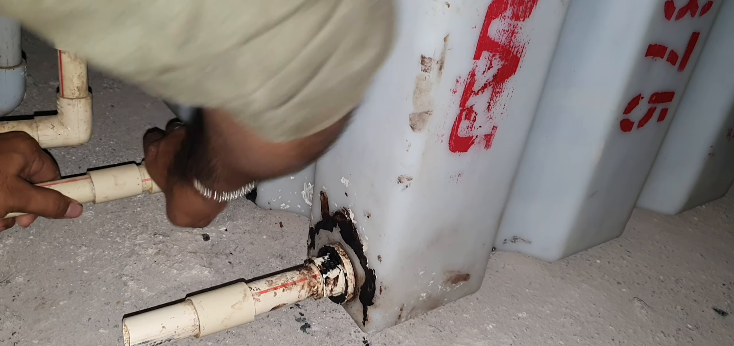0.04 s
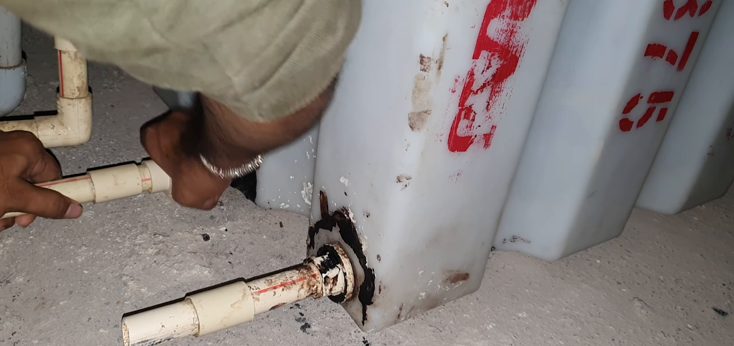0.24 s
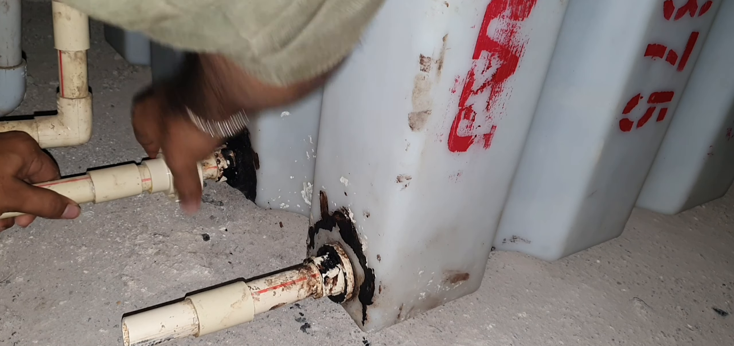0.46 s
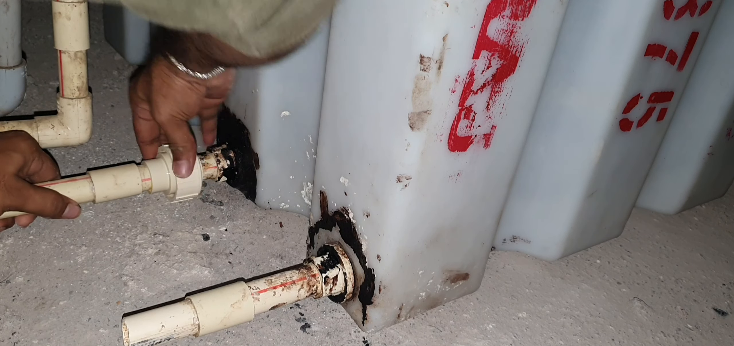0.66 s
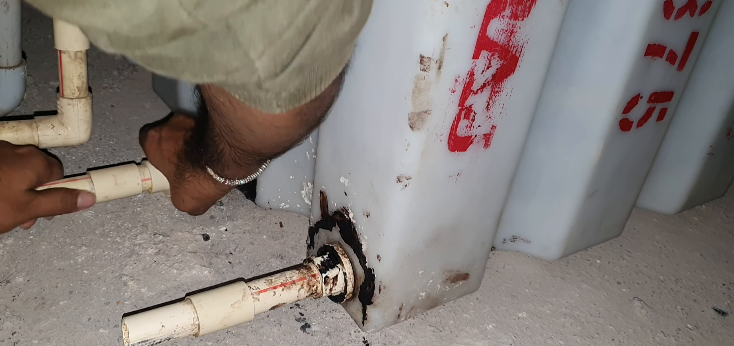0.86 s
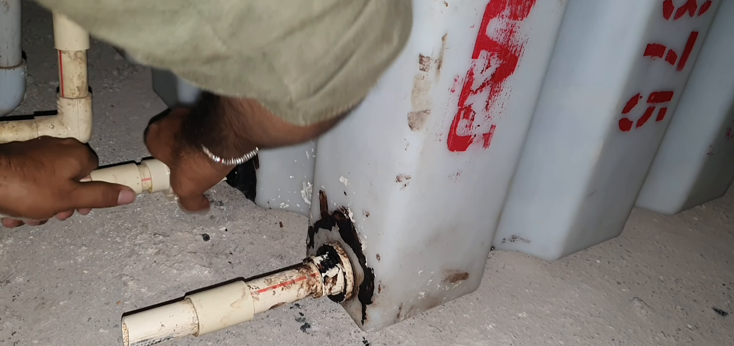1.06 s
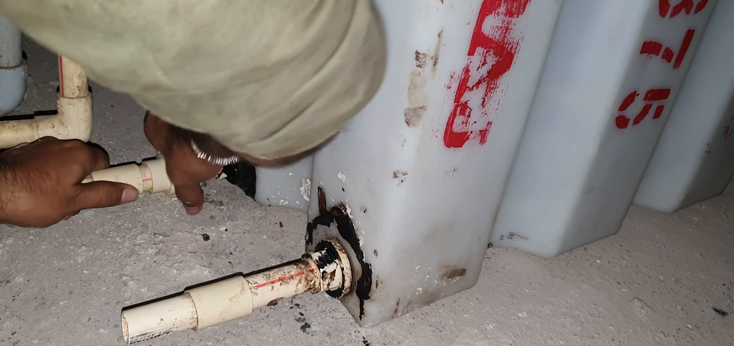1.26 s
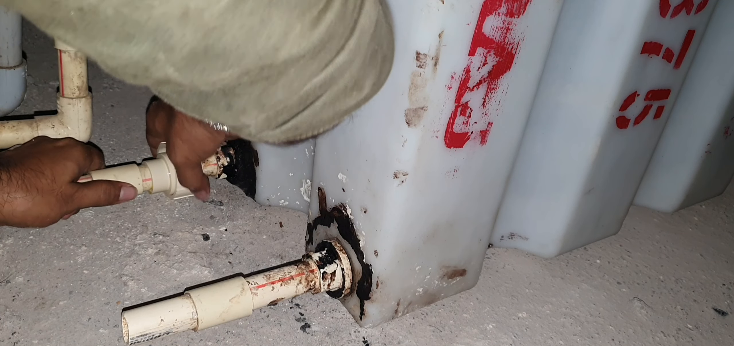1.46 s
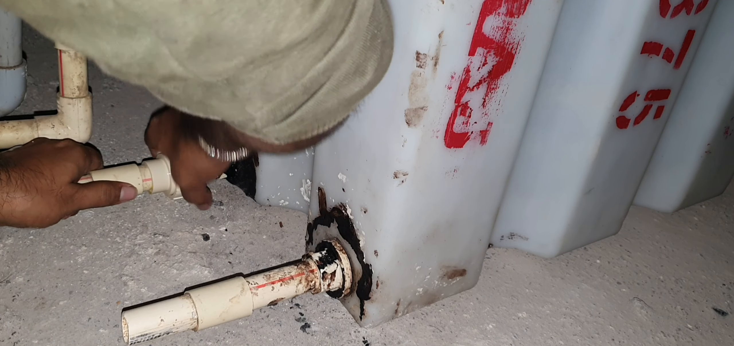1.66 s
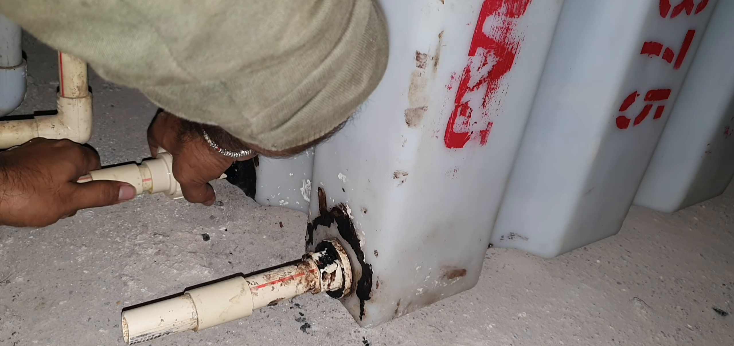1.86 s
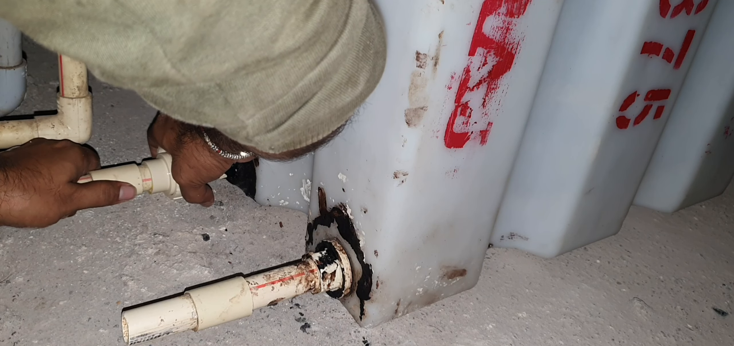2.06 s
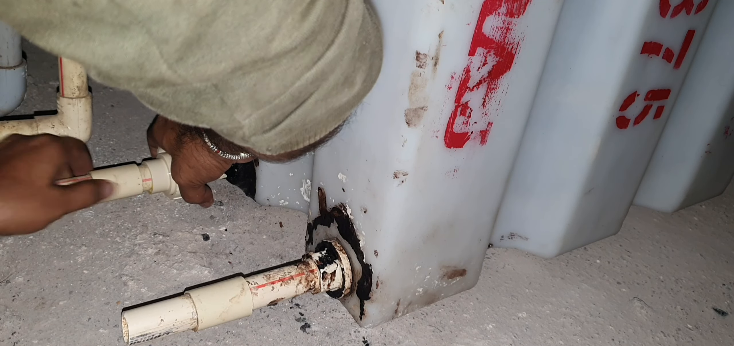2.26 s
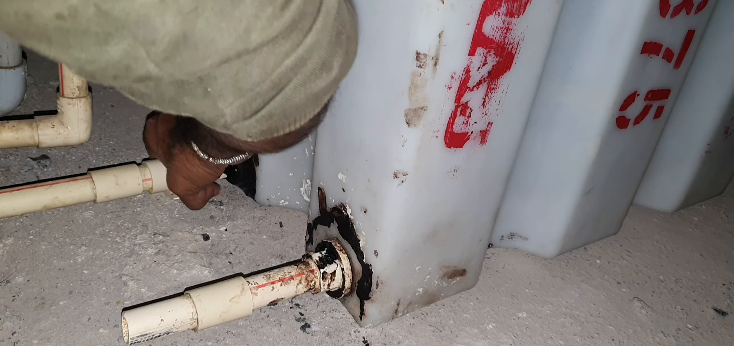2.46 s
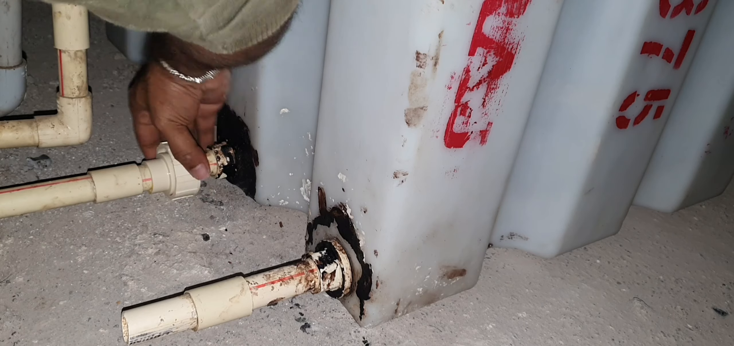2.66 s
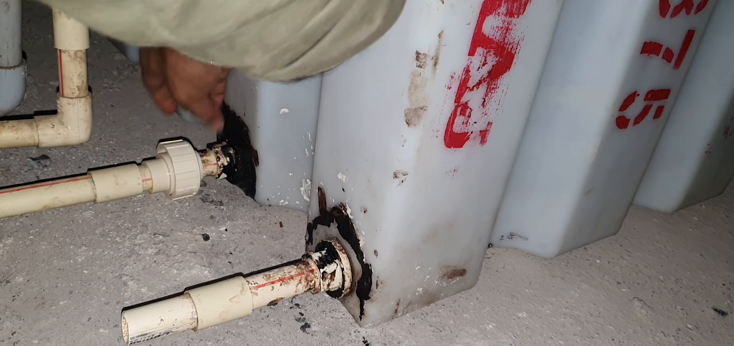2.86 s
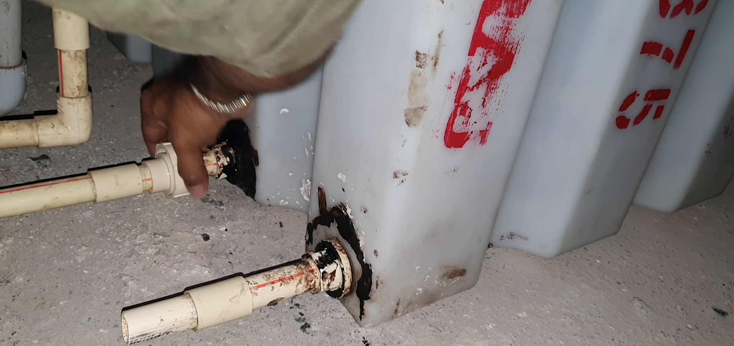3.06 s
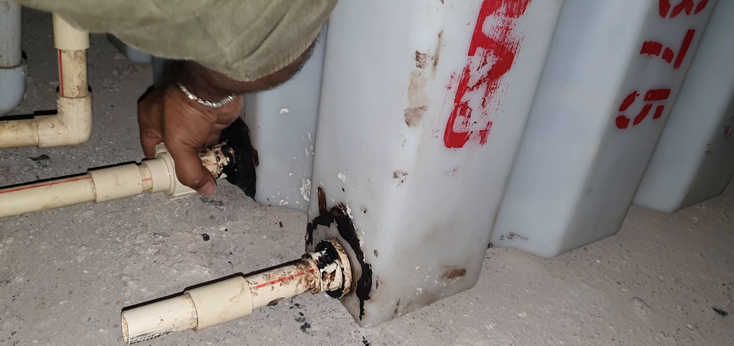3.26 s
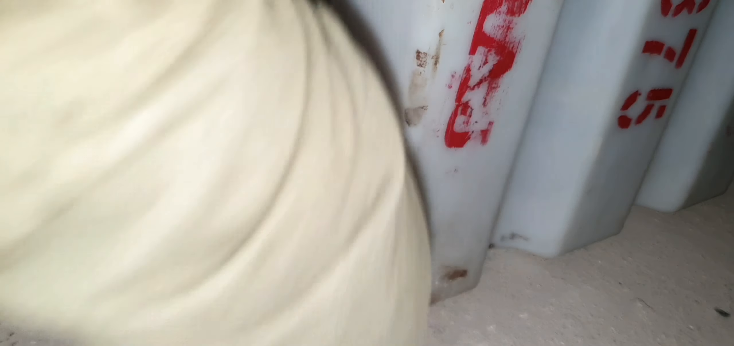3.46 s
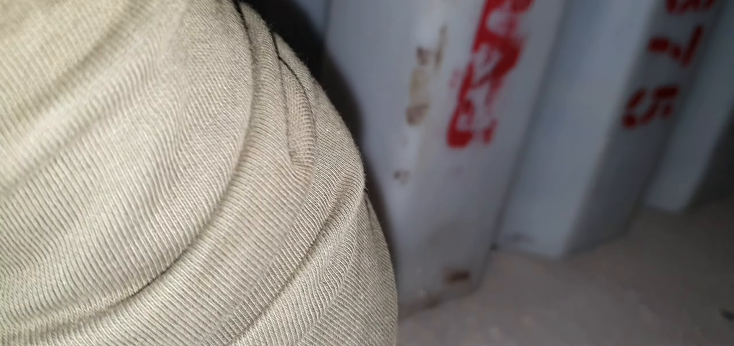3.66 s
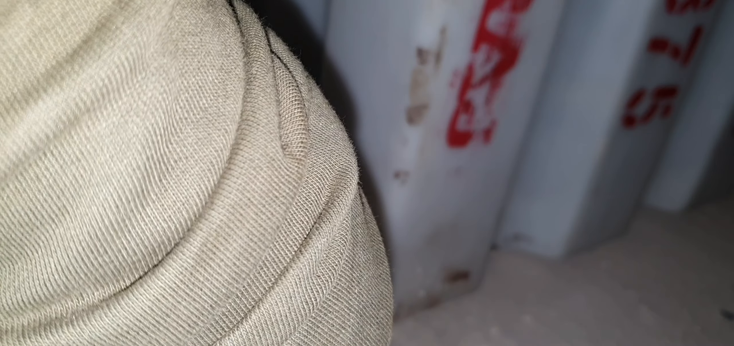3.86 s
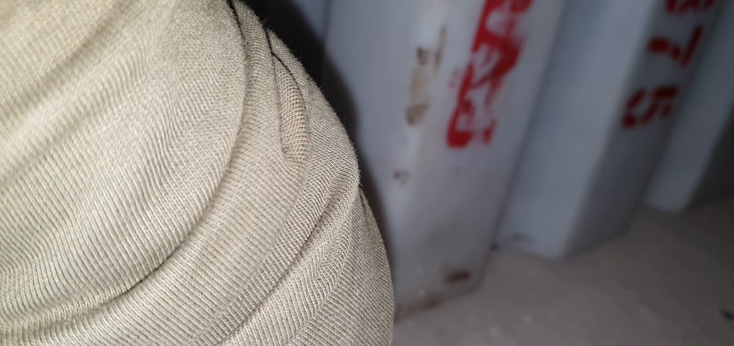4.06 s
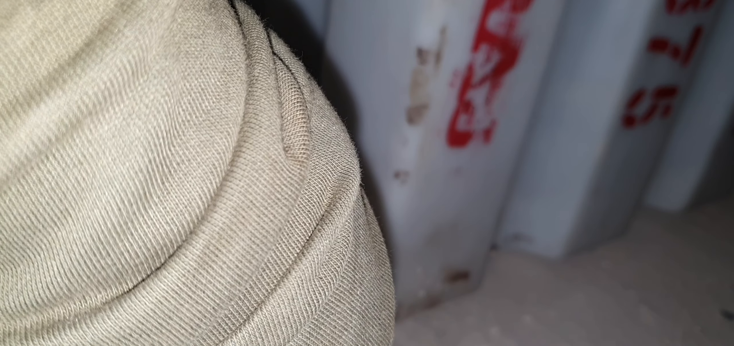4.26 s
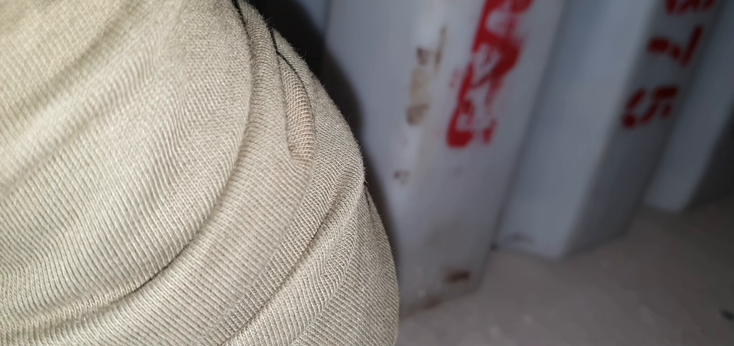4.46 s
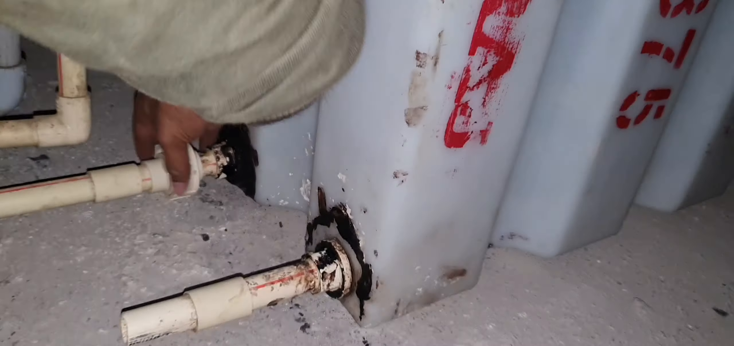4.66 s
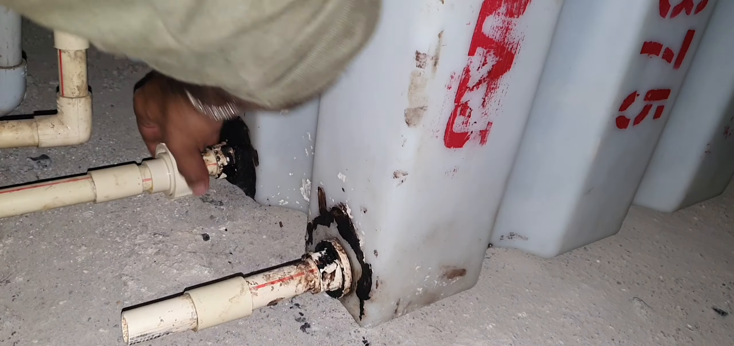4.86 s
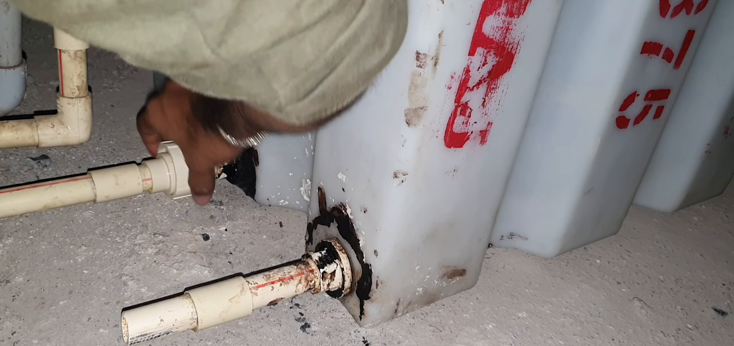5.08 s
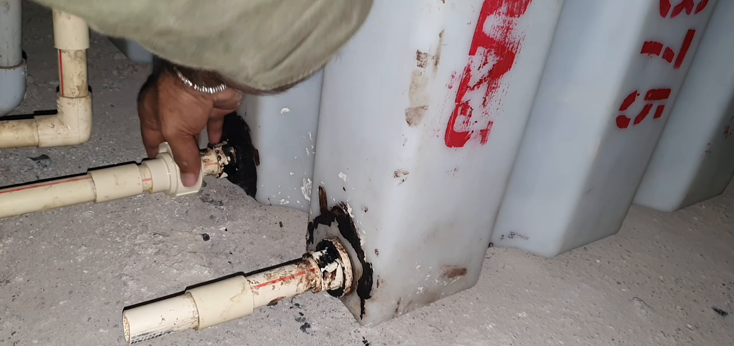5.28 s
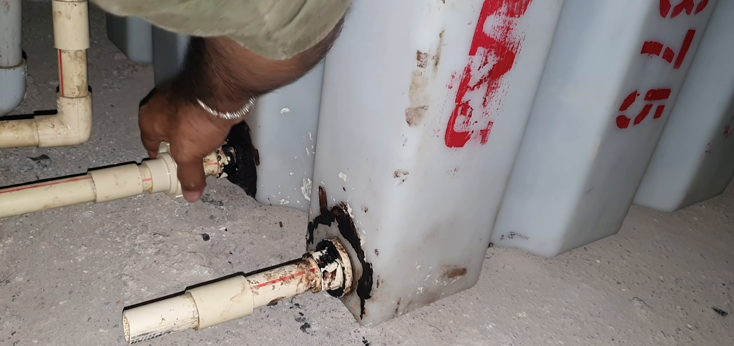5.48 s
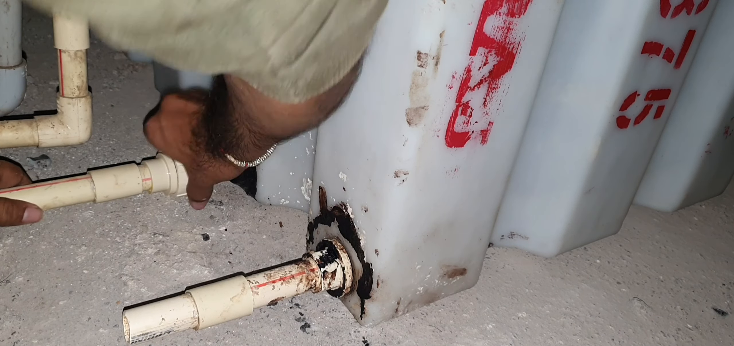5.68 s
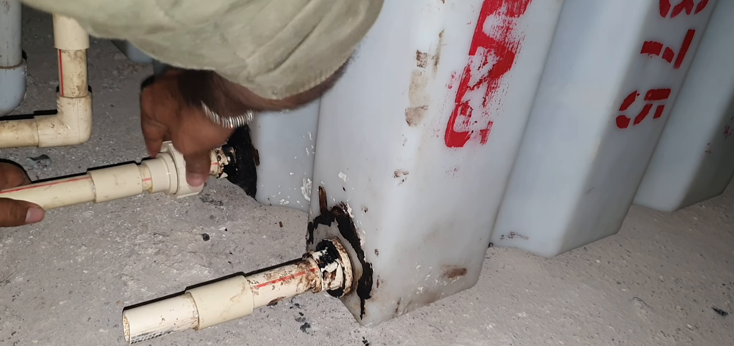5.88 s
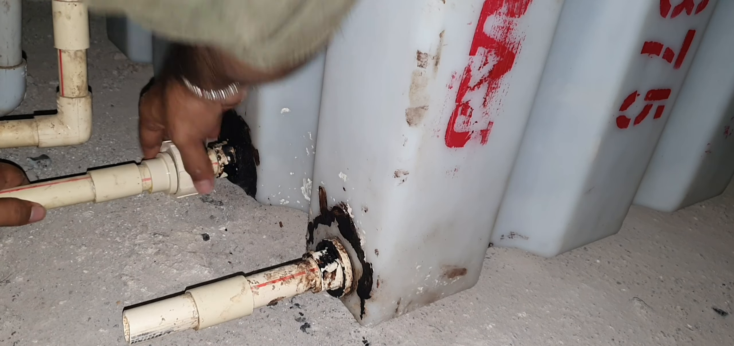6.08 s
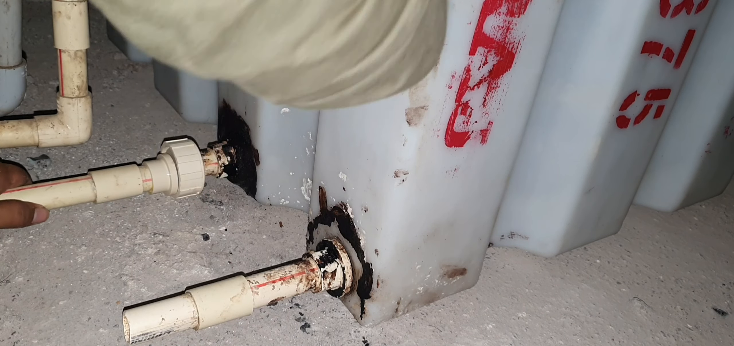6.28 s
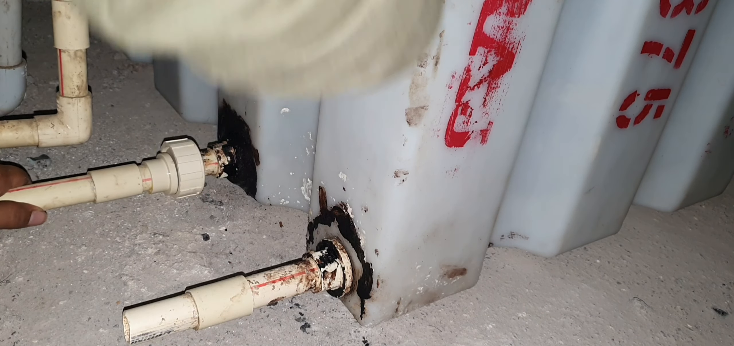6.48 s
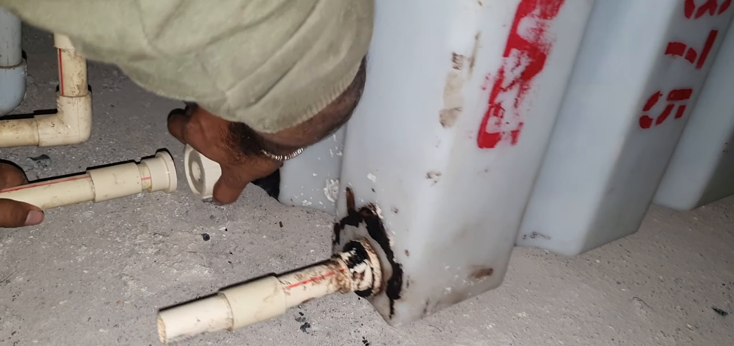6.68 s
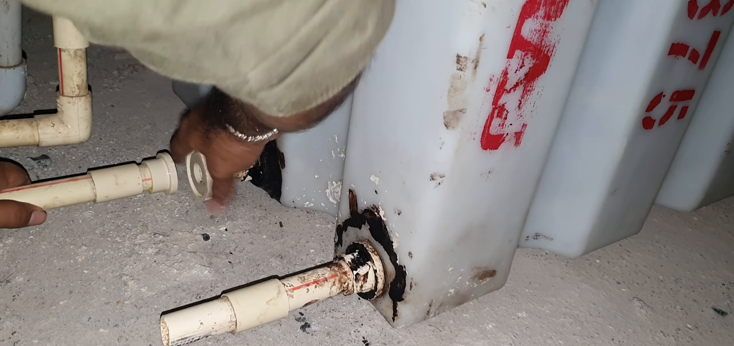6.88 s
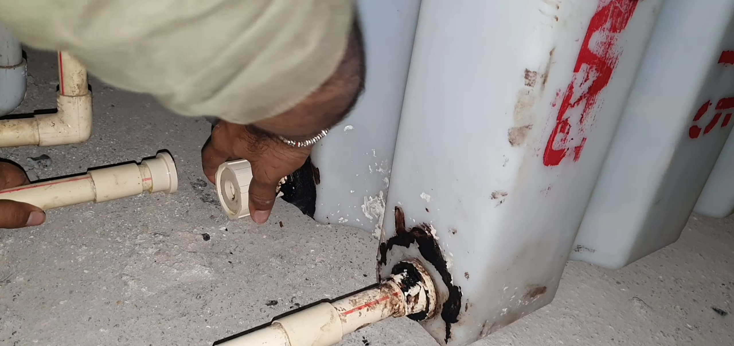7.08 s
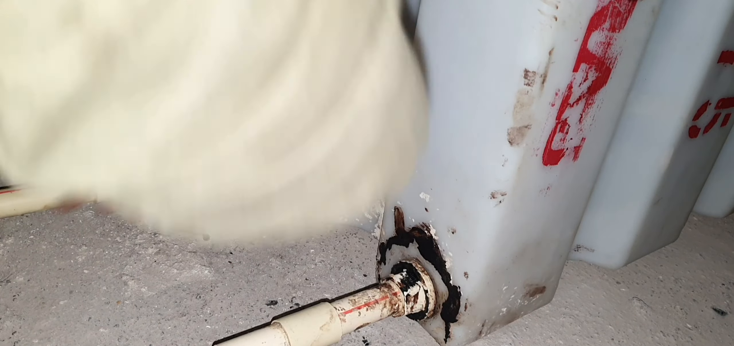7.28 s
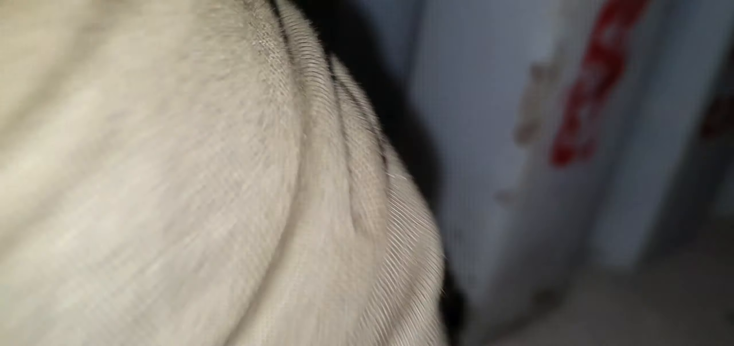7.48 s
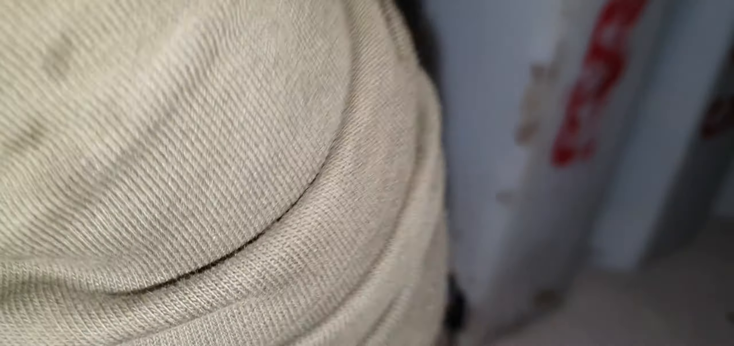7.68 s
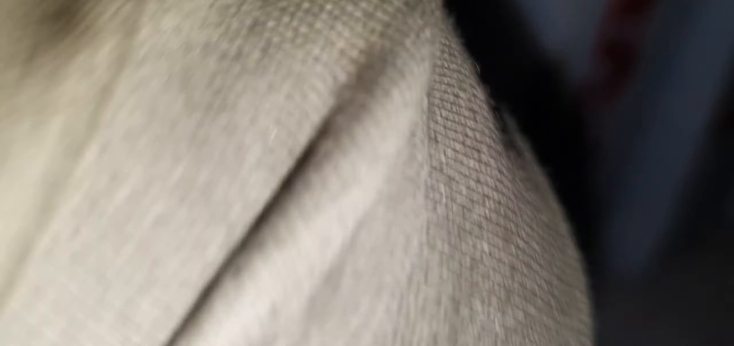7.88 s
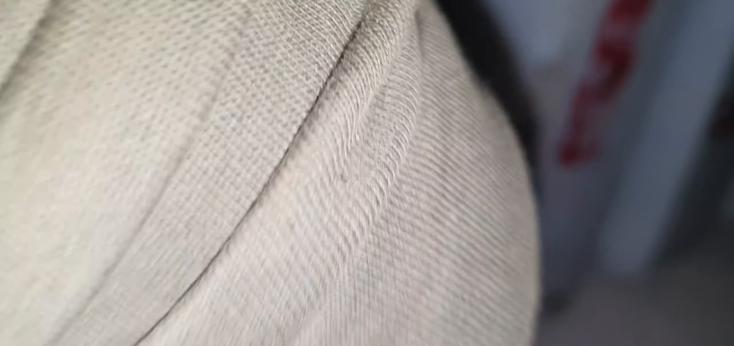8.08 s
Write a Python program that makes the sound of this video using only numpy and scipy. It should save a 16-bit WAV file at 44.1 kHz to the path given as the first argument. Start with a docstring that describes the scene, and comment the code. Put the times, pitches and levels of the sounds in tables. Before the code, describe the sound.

Close plastic fitting work in a quiet bare room: hollow bumps, sharp thread snaps and gritty rubbing, in busy bursts separated by short rests.

```python
"""A hand unscrews a plastic nut on a pipe beside a large hollow tank, in a quiet bare room: about 8 seconds.
First come clicks, scrapes and thuds; after a short rest a second bout, then a longer rest.
The third bout is the longest and busiest, running on into more turning; a few last touches end the scene.
Noise rings the nut and microphone, sine waves ring the tank, filtered noise rumbles in the pipe; a murmur lies below.
The microphone has an open port and a covered one, which hears the treble more faintly."""
import sys
import numpy as np
from scipy import signal
from scipy.fft import rfft, irfft, next_fast_len
from scipy.io import wavfile
from scipy.ndimage import uniform_filter1d

SR = 44100
rng = np.random.default_rng(int(sys.argv[2]) if len(sys.argv) > 2 else 0)


def put_to_file(sound):
    """Save the sound as 16-bit audio at rate SR, in the file named by the first command-line argument."""
    columns = np.atleast_2d(sound).T  # one column per channel
    safe = np.clip(columns, -1, 1)
    whole_steps = np.round(safe * 32767)
    wavfile.write(sys.argv[1], SR, whole_steps.astype(np.int16))


N = 358533

# Murmur of the room, its spectrum: pitch_hz, level_db (per Hz)
ROOM_SPECTRUM = [(12, -32.5), (20, -8.5), (81, 2), (116, 2), (172, -14.5), (241, -11), (301, -6.5),
                 (1060, -29.5), (1150, -26), (2080, -35.5), (3950, -38.5), (6180, -43.5), (7310, -59.5),
                 (11800, -53), (16000, -59.5)]
ROOM_DB = -52
# Slow swell of the murmur: time_s, swell (no unit; 1 lifts the bass by 3 dB)
MURMUR_SWELL = [(0, 1), (1.602, 0), (2.102, 0.5), (2.6, 0), (3.7, -0.5), (4.5, -0.5), (7.4, -1), (7.8, 0)]
SWELL_TILT = 0.65  # extra dB per octave above 400 Hz for a swell of 1

# How the two ports differ: pitch_hz, level_db (by which the open port is louder)
COVER_LOSS = [(60, -3.5), (120, -1), (240, 1.5), (480, 4), (950, 9.5), (1890, 9.5), (3770, 12.5),
              (7520, 11), (15000, 6.5)]
# How alike the two ports sound: pitch_hz, likeness (0 to 1)
PORT_LIKENESS = [(60, 0.98), (200, 0.88), (350, 0.8), (700, 1), (3000, 0.3), (7000, 0.54), (12000, .7)]
HOUSING_HZ, EDGE_HZ = 2500, 16300  # upper limits of the housing and of the whole sound

# Spectrum of the shaking pipe: pitch_hz, level_db (per Hz)
SHAKE_SPECTRUM = [(12, -33.5), (24, -16), (38, -7), (48, 10), (62, 1), (80, -3), (100, -12.5), (140, -81.5),
                  (300, -110)]
# Spectrum of the creaking pipe: pitch_hz, level_db (per Hz)
CREAK_SPECTRUM = [(50, -39.5), (80, -4.5), (120, 8.5), (200, -0.5), (300, -9.5), (480, -19), (800, -35.5),
                  (1500, -70), (3000, -110)]
# Spectrum of the rattling loose pipe: pitch_hz, level_db (per Hz)
RATTLE_SPECTRUM = [(120, -37), (240, 3), (320, 1.5), (470, -0.5), (600, -11.5), (900, -26), (1500, -63),
                   (3000, -110)]
# The grip, one list for each bout of work: time_s, shaking_db, rubbing_db
GRIP_BOUTS = [
    [(0.0, -24.5, -41.5), (0.07, -26, -78), (0.138, -43, -73), (0.176, -26.5, -61), (0.746, -48.5, -68.5),
     (0.848, -30.5, -59.5), (0.918, -41, -70), (1.106, -22.5, -80), (1.154, -46, -65.5),
     (1.584, -47.5, -83.5), (1.72, -76, -89)],
    [(2.27, -67, -77.5), (2.512, -48, -60.5), (2.564, -23, -67.5), (2.62, -37, -69), (2.66, -27.5, -68),
     (3.008, -38.5, -68), (3.072, -30.5, -65), (3.36, -39.5, -62), (3.396, -39, -59.5), (3.65, -46, -83),
     (3.72, -60.5, -85.5)],
    [(4.62, -50, -69), (4.726, -53.5, -72), (4.834, -25, -56), (4.904, -38, -58), (4.932, -26, -57.5),
     (5.566, -34, -61.5), (5.614, -26.5, -58), (5.692, -34.5, -61.5), (6.164, -27, -65), (6.28, -24.5, -70),
     (6.38, -44.5, -90)],
    [(6.38, -55, -84.5), (6.414, -42, -93), (6.578, -48, -63), (6.742, -10.5, -67.5), (6.814, -25.5, -68),
     (6.982, -41, -79), (7.012, -26, -63), (7.112, -36, -67), (7.152, -47, -67), (7.274, -54, -62.5),
     (7.32, -75, -73)],
    [(7.58, -72, -67.5), (7.65, -69.5, -69), (7.672, -66, -68), (7.74, -52.5, -59), (7.766, -75, -66),
     (7.784, -57, -81), (7.84, -68, -61), (7.932, -26.5, -60.5), (8.01, -45.5, -89.5), (8.098, -89, -52),
     (8.13, -72, -74)],
]
CREAK_DB, CREAK_SHARE = -12.5, 0.98  # creak level, and its dB for each dB of shaking

# Ways the tank rings: pitch_hz, level_db
TANK_MODES = [(52, -8.5), (80, -0.5), (105, -1.5), (130, -0.5), (160, 0), (193, 0), (235, 0), (310, -8),
              (390, -5.5), (480, -6.5)]
# Swelling thuds: peak_s, level_db, favoured_pitch_hz, hardness_db, length_s
SWELLING_THUDS = [(0.068, -33, 172, -26, .03), (0.178, -6.5, 142.2, -24, 0.018),
                  (0.202, -7, 163, -13, 0.02), (0.264, -16.5, 102, -33.5, 0.01),
                  (0.325, -11.5, 86, -13, 0.033), (0.347, -18, 178, -30, 0.03), (0.495, -18, 191, -5, .017),
                  (0.586, -21.5, 127.5, -17, 0.039), (0.639, -22.5, 81, -13, 0.022),
                  (0.699, -27, 110, -34, .07), (0.823, -13, 114.5, -14.5, 0.033),
                  (0.983, -28.5, 185, -28, 0.023), (1.032, -4.5, 107, -17, 0.03),
                  (1.223, -16.5, 109.4, -8.5, 0.032), (1.399, -13, 181.4, -5, 0.017),
                  (1.435, -11.5, 137.3, -7.5, 0.023), (1.581, -40.5, 67.4, -28.5, .07),
                  (2.351, -31, 175.4, -11, 0.036), (2.36, -37, 79, -26, 0.082),
                  (2.647, -21.5, 74, -24, 0.043), (2.7, -27, 116.7, -16.5, 0.098),
                  (2.762, -34, 128, -31, .042), (2.835, -21, 141, -6, 0.035),
                  (3.072, -25, 88.4, -14.5, 0.11), (3.2, -24.5, 78.5, -24, 0.064),
                  (3.375, -35, 180, -20.5, 0.028), (3.441, -42.5, 130, -5, 0.041),
                  (3.574, -33.5, 113, -35, 0.017), (4.77, -33.5, 79.7, -16, 0.04),
                  (4.829, -27.5, 502.5, 1.5, 0.021), (4.937, -15.5, 110.5, -30, .025),
                  (5.04, -27.5, 129.6, -7, 0.074), (5.124, -30.5, 89.8, -13, 0.027),
                  (5.165, -26.5, 78.7, -8.5, .06), (5.27, -9, 116, -8, .035),
                  (5.589, -12.5, 101.6, -7, .021), (5.612, -6, 110, -14, .037),
                  (5.724, -13.5, 87.1, -8, 0.032), (5.799, -28, 74, -29.5, .044),
                  (5.826, -18, 120.4, 1, .016), (5.937, -27, 109, -42.5, .021), (6, -16, 150, -14.5, 0.022),
                  (6.084, -14.5, 160.2, -11.5, 0.032), (6.153, -22.5, 74.6, -26, 0.14),
                  (6.224, -7, 119, -12, 0.038), (6.245, -21.5, 186.4, -8.5, 0.038),
                  (6.425, -27.5, 75, -31, 0.03), (6.467, -23, 126, -15.5, .026),
                  (6.511, -27.5, 167, -11.5, .03), (6.556, -21.5, 114.6, -22.5, .018),
                  (6.68, -14.5, 120.2, -2.5, 0.059), (6.732, -12.5, 150.8, -12, 0.06),
                  (6.773, -28.5, 449, -4, 0.027), (6.871, -18.5, 125.8, -7.5, 0.039),
                  (7.049, -21, 153.5, -30, 0.026), (7.144, -30.5, 91.1, -11, 0.07),
                  (7.265, -34.5, 113.7, -9.5, 0.042), (7.681, -43, 252, -12.5, 0.015),
                  (7.687, -23.5, 491, -15, 0.021), (8.083, -29, 406, -12, 0.014),
                  (8.09, -33, 137.5, -17, 0.014)]
# Sudden blows as the nut seats or the pipe hits: peak_s, level_db, favoured_pitch_hz, hardness_db, length_s
SUDDEN_BLOWS = [(0.046, -11, 112.3, -10.5, 0.031), (0.472, -15.5, 187.7, -24, .038),
                (2.561, -6.5, 128.8, -18, .023), (2.897, -22, 188, -20.5, 0.022),
                (3.145, -19.5, 151.5, -12, 0.041), (3.292, -4, 182, -19, 0.021),
                (4.826, -11.5, 116.4, -5, 0.024), (5.403, -6, 127, -15.5, 0.019),
                (5.865, -25.5, 137.2, -32, 0.022), (5.961, -12, 186.8, -8.5, 0.019),
                (6.758, -11, 87, -21, .026), (7.022, -11.5, 123.1, -14.5, 0.044),
                (7.081, -18.5, 89.2, -19.5, .041), (7.197, -27.5, 193, 8, 0.017),
                (7.917, -6, 143.1, -6.5, 0.029), (7.925, -22.5, 467, -13, .022)]
THUD_RISE, BLOW_RISE = 0.51, 0.29  # share of the length spent rising
# The pipe sways after each push; sudden blows and higher pitches move it less
SWAY_DB, SWAY_LAG_S, SWAY_RISE_S, SWAY_FALL_S = -20.5, 0.0071, 0.013, 0.028
SWAY_DB_PER_OCTAVE, BLOW_SWAY_DB = -5.5, -3.5
JOLT_DB = -45.5  # rubbing shaken loose by each push

# Ringing of the nut, and the microphone's bright peak near 10 kHz: pitch_hz, width_hz, level_db
NUT_AND_MIC_RINGS = [(790, 50, -6.5), (1390, 260, -22.5), (3330, 72, 4), (4450, 360, -18.5),
                     (6570, 300, -15), (9980, 1100, 0.5)]
# Microphone's resonance near 2.3 kHz, which some contacts wake more: pitch_hz, width_hz, level_db
MIC_RINGS = [(2090, 71, -10.5), (2319, 200, -3), (2470, 67, -13)]
# Sharp snaps of the nut on its thread: peak_s, level_db, mic_ring_db, sharpness_db, hardness_db
THREAD_SNAPS = [(0.0363, -29.5, 13, -12, -11), (0.1621, -25, 1, -3.5, -16.5), (0.8174, -23, -5.5, -8, -9),
                (1.388, -17, -8, -7.5, -31), (2.8147, -44, 8.5, -8.5, -13), (3.2795, -31, -1, -15, -18.5),
                (5.139, -34, 2.5, -4, -21), (5.9532, -18.5, 7.5, -3, -18), (6.0852, -19.5, 4.5, -4, -23),
                (6.2155, -16.5, 8, -1.5, -11.5), (6.6996, -19.5, 5, -2, -14.5),
                (7.1925, -26.5, -0.5, -5.5, -11)]
SNAP_RISE_S, SNAP_FALL_S = 0.0005, 0.0079
# Short scrapes of nut and fingers: peak_s, level_db, mic_ring_db, sharpness_db, length_s
SHORT_SCRAPES = [(0.054, -29.5, -13, -18, 0.025), (0.172, -31.5, 7.5, -16, .02),
                 (0.1984, -25, 4.5, -19.5, 0.019), (0.256, -68, 4, 11.5, .034),
                 (0.316, -31.5, 4, -8, 0.018), (0.3284, -29.5, 3, -12.5, 0.019),
                 (0.479, -41, 2, -15, 0.0086), (0.4893, -34.5, -10, -40, 0.036),
                 (0.579, -42, -1, -17, 0.024), (0.612, -54.5, 1.5, -4.5, 0.02),
                 (0.708, -50.5, -1, -11, 0.029), (1.023, -31, 6.5, -24, 0.012),
                 (1.024, -39.5, 3, -4, 0.037), (1.044, -42, 7.5, -14, 0.029), (1.188, -56, -7, 9, 0.0073),
                 (1.218, -34.5, 1, -14, 0.027), (1.402, -31.5, -5, -12, 0.019),
                 (1.431, -38.5, -3.5, -16, 0.031), (2.354, -63, -17, 7, 0.041),
                 (2.562, -32.5, 1, -24, 0.026), (2.6276, -56.5, -6, -1, 0.033),
                 (2.71, -53, -1, -10.5, 0.049), (2.83, -45, -6, -12, 0.038), (2.886, -55.5, -11, -3, .027),
                 (2.926, -56.5, -3, -1.5, 0.026), (3.031, -50, -4, -8.5, 0.049),
                 (3.14, -44.5, -10.5, -16, 0.013), (3.157, -48.5, -9, -7.5, 0.056),
                 (3.292, -26.5, 0.5, -17.5, 0.017), (4.712, -60, -15, -6.5, .06),
                 (4.824, -26.5, -4.5, -34, 0.025), (4.843, -29.5, 3, -10, 0.0087),
                 (4.943, -47.5, 3, -14, 0.037), (5.0394, -46, -8, -18, 0.014),
                 (5.0604, -49.5, -2, -17, 0.022), (5.237, -40.5, 0, -0.5, 0.021),
                 (5.2548, -28.5, 5, -12.5, 0.035), (5.393, -38.5, 7, -3.5, 0.018),
                 (5.404, -33.5, 12.5, -13.5, 0.021), (5.503, -63, -5, -5, 0.025), (5.58, -40, 1, -8, 0.015),
                 (5.6034, -26.5, 4.5, -19, 0.031), (5.614, -37.5, 6.5, -12, 0.02),
                 (5.714, -34.5, 4.5, -8, 0.031), (5.828, -31.5, -5, -20.5, 0.027),
                 (5.937, -63, 2, 3.5, 0.017), (5.966, -26.5, -1, -10, 0.012), (5.998, -34, 5, -14, 0.025),
                 (6.077, -42.5, 8.5, -0.5, 0.037), (6.21, -29.5, 2.5, -6.5, 0.025),
                 (6.236, -31, 4, -16.5, 0.028), (6.265, -51.5, 1, -14.5, 0.035),
                 (6.321, -58, -4, 5.5, 0.037), (6.517, -78, -3, 12, .03), (6.559, -68.5, 5, 16, 0.028),
                 (6.617, -60.5, -8, 4, 0.051), (6.655, -34.5, 8.5, -8, 0.022),
                 (6.678, -29.5, -1, -18.5, 0.049), (6.721, -31, 2.5, -1, 0.02), (6.751, -46, -15, 0, 0.048),
                 (6.851, -36, -1, -29, 0.024), (6.877, -46, -5, -33, 0.022), (7.02, -35, -5, -10.5, 0.035),
                 (7.047, -53.5, -11, 2, 0.017), (7.083, -54.5, -10, -4.5, 0.032),
                 (7.1464, -50.5, -4, -7, 0.025), (7.205, -47.5, -14, 0.5, 0.028),
                 (7.335, -76.5, -5, 15.5, 0.053), (7.3874, -71.5, 8, 15, 0.037),
                 (7.623, -57.5, -3, 3.5, 0.022), (7.681, -34.5, -7.5, -7, 0.025),
                 (7.73, -66.5, -6, 3, 0.067), (7.793, -75.5, -12.5, 12.5, 0.069),
                 (7.895, -64, -2, 9.5, 0.034), (7.921, -34.5, -11.5, -34, .027),
                 (7.952, -49, -19, -26.5, 0.019), (8.0884, -34, -5, -13, 0.026)]
SCRAPE_RISE = 0.44  # share of the length spent rising
# Fizz compared with sharpness, for a scrape at -39.5 dB; fainter scrapes fizz more
SCRAPE_FIZZ_DB, FIZZ_PER_DB = -14.5, -0.11


def gain_of(db):
    """Turns decibels into a plain multiplier."""
    return 10 ** (np.asarray(db) / 20)


def evened(x):
    """Scales a signal to an average strength (rms) of 1."""
    return x / np.sqrt(np.mean(x ** 2) + 1e-20)


def smoothed_noise(shape, size):
    """Random noise averaged over a short stretch of samples (size), so that it drifts smoothly, at rms 1."""
    return evened(uniform_filter1d(rng.standard_normal(shape), size=size))


def read(points, hz):
    """Reads a table between its points, on a logarithmic pitch axis."""
    f, value = np.transpose(points)
    return np.interp(np.log(hz + 1), np.log(f + 1), value)


def add(mix, s, sound):
    """Mixes a sound in at s seconds, cutting off what falls outside."""
    sound = sound[..., max(-round(s * SR), 0):]
    part = mix[..., max(round(s * SR), 0):][..., :sound.shape[-1]]
    part += sound[..., :part.shape[-1]]


def colour(x, points):
    """Filters noise to a given spectrum without any sound ahead of its cause; white noise keeps its power."""
    level_db = read(points, abs(np.fft.fftfreq(8192, 1 / SR)))
    log_gain = np.log(gain_of(np.maximum(level_db, -100)))
    minimum_phase = -signal.hilbert(log_gain).imag
    taps = np.fft.ifft(np.exp(log_gain + 1j * minimum_phase)).real[:4096]
    return signal.oaconvolve(x, taps[None] / np.linalg.norm(taps), axes=1)[:, :N]


def ring(x, hz, width):
    """Rings at one pitch, passing that pitch at gain 1."""
    return signal.lfilter(*signal.iirpeak(hz, hz / width, SR), x)


def band(x, lo_hz, hi_hz):
    """Keeps one range of pitches, scaled so that white noise keeps its power."""
    sos = signal.butter(4, [lo_hz, hi_hz], "band", fs=SR, output="sos")
    return signal.sosfilt(sos, x) * np.sqrt(SR / 2 / (hi_hz - lo_hz))


def bump(rise, fall, curve):
    """Times around a peak, and a swell 9 dB down at rise s before it and fall s after it, within limits."""
    rise, fall = np.clip(rise, .0003, .06), np.clip(fall, .002, .09)
    t = np.arange(-3 * rise, 7 * fall, 1 / SR)
    steps = abs(t) / np.where(t < 0, rise, fall)
    return t, gain_of(-9 * steps ** np.where(t < 0, 2, curve))


def ports(pair, late_s):
    """Two draws of one sound become the open and covered port; above 350 Hz the latter lags (leads if negative)."""
    hz = np.fft.rfftfreq(N, 1 / SR)
    a, b = rfft(pair)
    same = np.clip(read(PORT_LIKENESS, hz), 0, 1)
    late = np.exp(-2j * np.pi * np.maximum(hz - 350, 0) * late_s)
    cover = gain_of(-read(COVER_LOSS, hz))
    covered = cover * (same * late * a + np.sqrt(1 - same ** 2) * b)
    # keep the power of the two ports' average the same at every pitch
    sum_power = 1 + cover ** 2 + 2 * cover * same * late.real
    return irfft(np.array([a, covered]) * 2 / np.sqrt(sum_power), N)


def walls(x):
    """Short echo tail from floor and tank wall: sparse taps of random sign, the treble dying first."""
    t = np.arange(SR // 4) / SR
    taps = rng.choice([-1., 1.], len(t)) * (rng.random(len(t)) < .06) * (t > .004)
    tail = band(taps, 290, 4600) * gain_of(-60 * t / 0.15)
    tail += band(taps, 4200, 9000) * gain_of(-60 * t / 0.11)
    return signal.oaconvolve(x, tail[None] / np.linalg.norm(tail), axes=1)[:, :N]


def room():
    """Low murmur of air and distant traffic: noise in drifting patches, brighter as it swells."""
    frames, hz = N // 256 + 5, np.fft.rfftfreq(1024, 1 / SR)
    a, b, c, d, patches = rng.standard_normal((frames, 513, 5)).T
    patches = uniform_filter1d(patches, size=8, axis=0)
    patches = evened(uniform_filter1d(patches, size=20, axis=1))
    spectra = np.array([a + 1j * b, c + 1j * d]) * gain_of(1.1 * patches)
    swell = np.interp(np.arange(frames) * 256 / SR, *np.transpose(MURMUR_SWELL))
    octaves = np.clip(np.log2(hz / 400 + 1e-9), 0, 2.5)[:, None]
    spectra = spectra * gain_of(swell * (3 + SWELL_TILT * octaves))
    murmur = signal.istft(spectra, nperseg=1024, noverlap=768)[1][:, :N]
    return gain_of(ROOM_DB) * colour(evened(murmur), ROOM_SPECTRUM)


def dip(work):
    """Gain that makes the murmur sink while the work is loud and creep back afterwards."""
    power_db = 10 * np.log10(abs(uniform_filter1d((work ** 2).mean(0), size=800)) + 1e-12)
    fall_db = np.arange(N) * 29.0 / SR  # the followed work level falls at most 29 dB a second
    followed_db = np.maximum.accumulate(power_db + fall_db) - fall_db
    over_db = np.maximum(followed_db + 31.0, 0)
    return gain_of(-.25 * uniform_filter1d(over_db, size=800))


def grip(column):
    """Level in dB over time of one grip column; silent while the hand rests."""
    t = np.arange(N) / SR
    bouts = [np.interp(t, *np.array(rows)[:, [0, column]].T, -200, -200) for rows in GRIP_BOUTS]
    return np.max(bouts, axis=0)


def pushes():
    """Thuds and blows as rows: peak_s, level_db, pitch_hz, hardness_db, rise_s, fall_s, sway_db."""
    rows = []
    for table, rise, less_db in [(SWELLING_THUDS, THUD_RISE, 0), (SUDDEN_BLOWS, BLOW_RISE, BLOW_SWAY_DB)]:
        for s, db, hz, hard_db, length in table:
            sway_db = db + less_db + SWAY_DB_PER_OCTAVE * np.log2(hz / 120)
            rows.append((s, db, hz, hard_db, rise * length, (1 - rise) * length, sway_db))
    return rows


def sway():
    """Strength of the pipe's swing just after every thud and blow."""
    out = np.zeros(N)
    t, shape = bump(SWAY_RISE_S, SWAY_FALL_S, 2.8)
    for s, *_, db in pushes():
        add(out, s + SWAY_LAG_S + t[0], gain_of(db) * shape)
    return out


def rumble():
    """The grip shakes the pipe in a low wobble of fairly even strength, and makes it creak in lumps."""
    shake_noise, creak_noise = rng.standard_normal((2, 2, N))
    wobble = colour(shake_noise, SHAKE_SPECTRUM)
    strength = abs(signal.hilbert(wobble, next_fast_len(N))[:, :N])
    wobble = evened(wobble / (0.42 + strength))
    shake_db = grip(column=1)
    lumps = gain_of(4.5 * smoothed_noise(N, 1300))
    creak = colour(gain_of(CREAK_DB + CREAK_SHARE * shake_db) * lumps * creak_noise, CREAK_SPECTRUM)
    return (gain_of(shake_db - 2.0) + gain_of(SWAY_DB) * sway()) * wobble + creak


def thuds():
    """Each push wakes tank modes near its favoured pitch, others detuned and weakened; hard ones rattle the pipe."""
    out, hard = np.zeros((2, N)), np.zeros(N)
    mode_hz, mode_db = np.transpose(TANK_MODES)[..., None]
    chance = rng.random((len(pushes()), 3, len(TANK_MODES), 2))
    for (s, db, near_hz, hard_db, rise, fall, _), draw in zip(pushes(), chance):
        t, shape = bump(rise, fall, 1.09)
        nearest = mode_hz[abs(np.log(mode_hz / near_hz)).argmin()]
        others = mode_hz != nearest
        # shift all modes so that the nearest lands on the favoured pitch
        hz = mode_hz * near_hz / nearest * (1 + 0.067 * others * (draw[2, :, :1] - .5))
        weakened_db = 5.3 * others * draw[:2, :, :1] + 9.46 * abs(np.log2(hz / near_hz))
        sines = np.sin(2 * np.pi * (hz * t + draw[:2, :, 1:]))
        waves = (gain_of(mode_db - weakened_db) * sines).sum(1)
        add(out, s + t[0], gain_of(db - 2.5) * shape * evened(waves))
        add(hard, s + t[0], gain_of(db + hard_db - 6.0) * shape ** 1.2)
    return out + colour(hard * rng.standard_normal((2, N)), RATTLE_SPECTRUM)


def contact_strengths():
    """Strength over time of body, microphone ring, edge and fizz, driven by snaps, scrapes and rubbing."""
    drive = np.zeros((4, N))
    contacts = [(*row, SNAP_RISE_S, SNAP_FALL_S) for row in THREAD_SNAPS]
    for s, db, mic_db, edge_db, length in SHORT_SCRAPES:
        fizz_db = edge_db + SCRAPE_FIZZ_DB + FIZZ_PER_DB * (db + 39.5)
        contacts.append((s, db, mic_db, edge_db, fizz_db, SCRAPE_RISE * length, (1 - SCRAPE_RISE) * length))
    sooner = np.array([[1.0], [.9], [1.2], [1.4]])  # edge and fizz die sooner
    for s, db, mic_db, edge_db, fizz_db, rise, fall in contacts:
        t, shape = bump(rise, fall, 1.57)
        part_db = db + np.array([[0], [mic_db], [edge_db], [fizz_db]])
        add(drive, s + t[0], gain_of(part_db) * shape ** sooner)
    fits_db = 1.3 * smoothed_noise(N, 1500)  # rubbing comes in fits
    rubbing = gain_of(grip(column=2) + fits_db) + gain_of(JOLT_DB) * sway()
    return drive + rubbing * gain_of([[-3.0], [-8.0], [-6.0], [-18.0]])


def clicks():
    """Clumps of tiny slips ring the nut and the microphone; sharp contacts wake the edge, hard ones the fizz."""
    clumps = gain_of(1.67 * smoothed_noise((4, 1, N), 70) - 4.5)
    body, mic, edge, fizz = rng.standard_normal((4, 2, N)) * clumps * contact_strengths()[:, None]
    contact = gain_of(-1.5) * band(body, 550, 2000)
    contact += gain_of(-4.0) * band(edge, 2800, 5810)
    contact += gain_of(-7.0) * band(fizz, 8600, 12200)
    contact += gain_of(-30.0) * band(edge, 12000, 15800)
    mic = gain_of(3.5) * band(mic, 1676, 3356)
    sound = 0.91 * contact + 0.14 * mic
    sound += sum(gain_of(db) * ring(mic, hz, width) for hz, width, db in MIC_RINGS)
    sound += sum(gain_of(db) * ring(contact, hz, width) for hz, width, db in NUT_AND_MIC_RINGS)
    return sound + gain_of(-23.0) * walls(sound)


def scene():
    """Clicks and murmur come through the air, later at the covered port; thuds come dulled through the housing."""
    dull = signal.butter(6, HOUSING_HZ, fs=SR, output="sos")
    housing = signal.sosfilt(dull, thuds() + rumble())
    work = ports(clicks(), 0.00007) + ports(housing, -0.00046)
    return work + dip(work) * ports(room(), 0.00065)


def record(dry):
    """Gently squashes the loudest peaks, then cuts the highest treble."""
    squashed = 1.437 * np.tanh(dry / 1.393)
    treble_cut = signal.firwin(511, EDGE_HZ, window=("kaiser", 9), fs=SR)
    return signal.oaconvolve(squashed, treble_cut[None], "same")


dry = scene()
out = record(dry)
put_to_file(out)
```